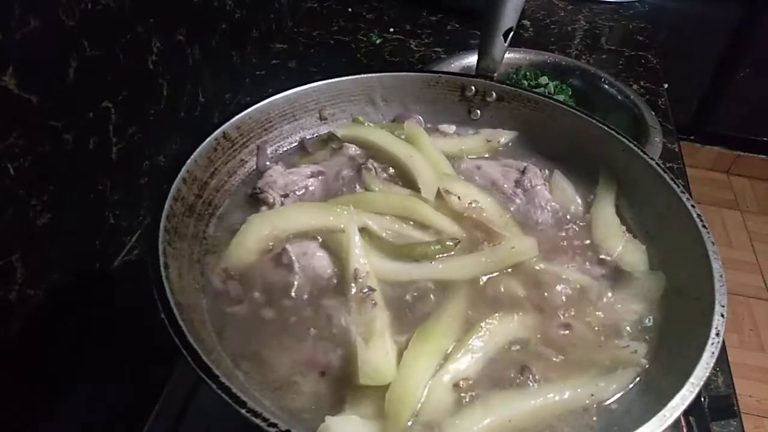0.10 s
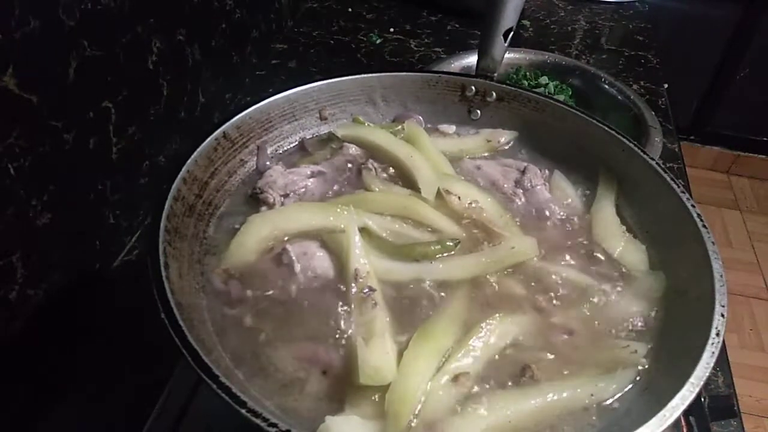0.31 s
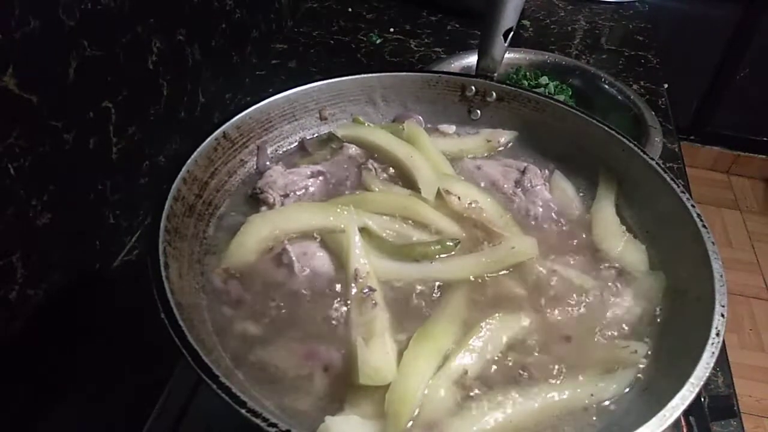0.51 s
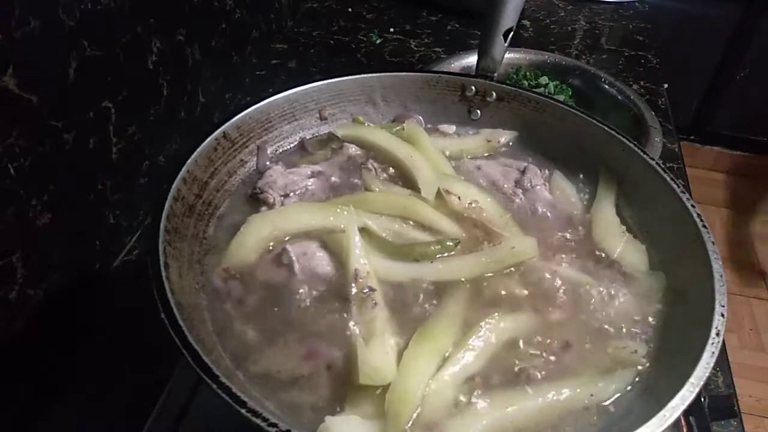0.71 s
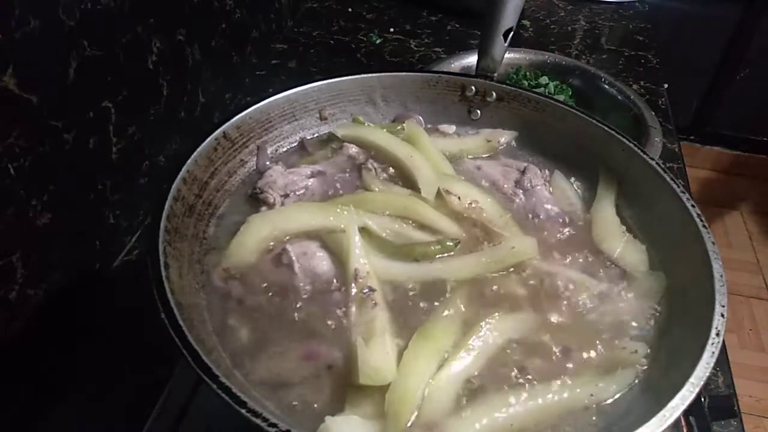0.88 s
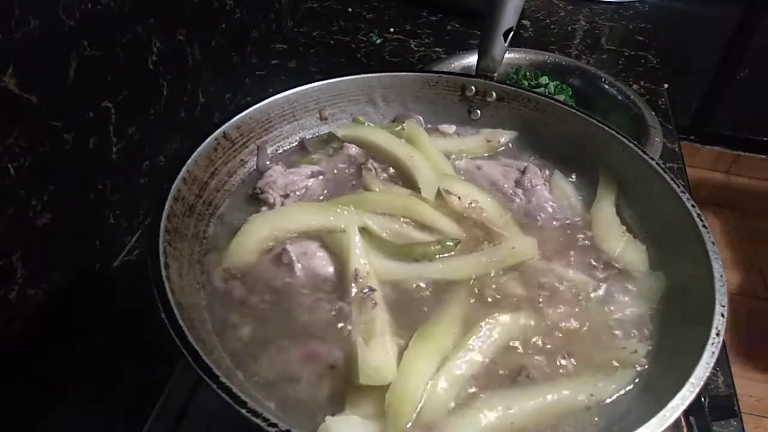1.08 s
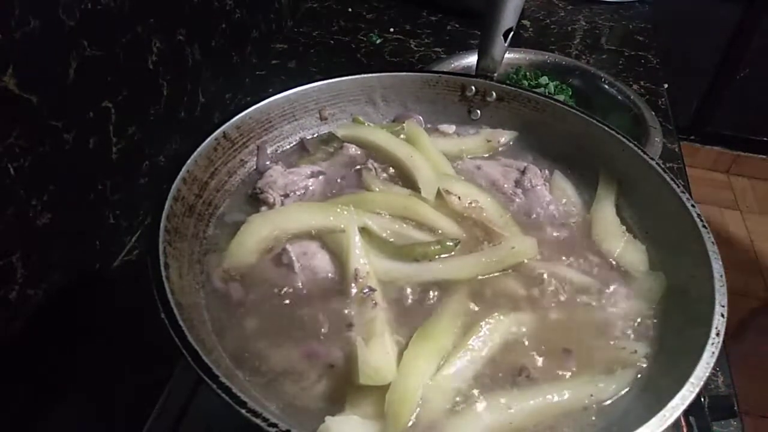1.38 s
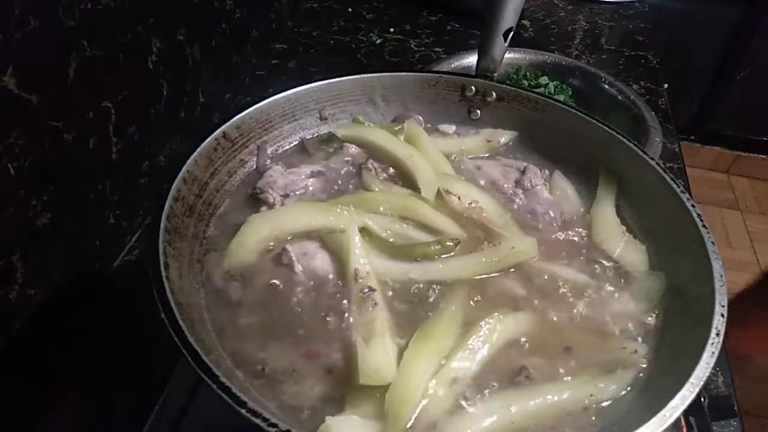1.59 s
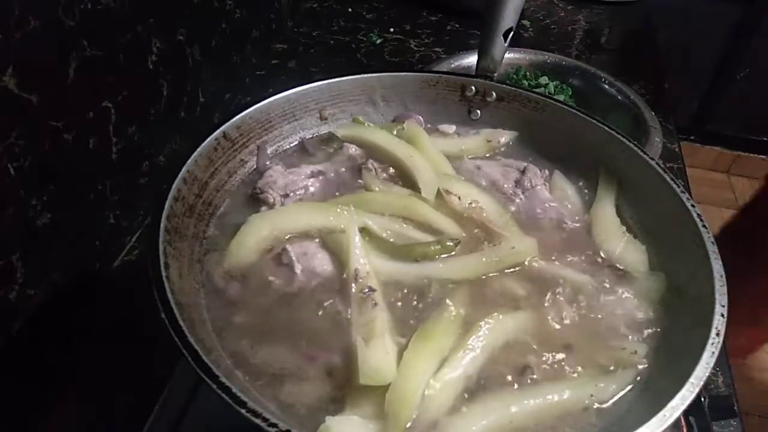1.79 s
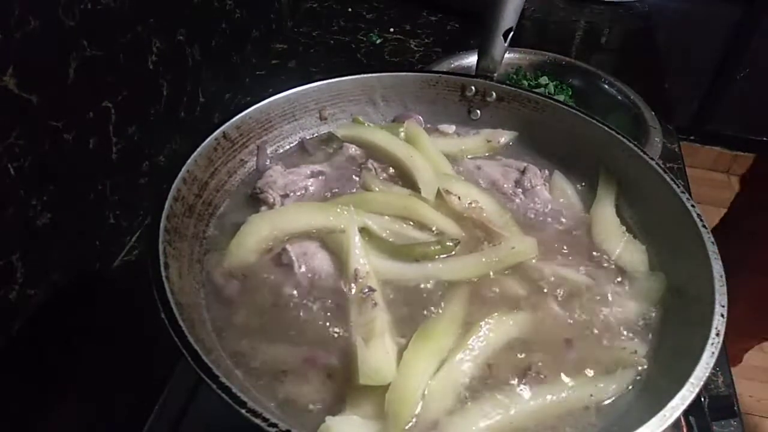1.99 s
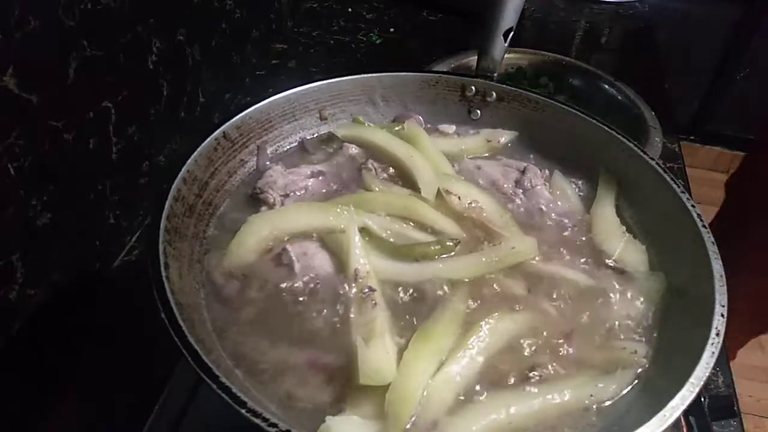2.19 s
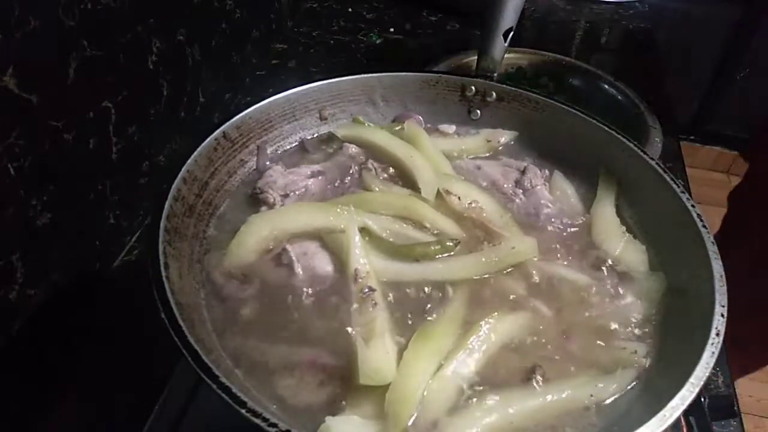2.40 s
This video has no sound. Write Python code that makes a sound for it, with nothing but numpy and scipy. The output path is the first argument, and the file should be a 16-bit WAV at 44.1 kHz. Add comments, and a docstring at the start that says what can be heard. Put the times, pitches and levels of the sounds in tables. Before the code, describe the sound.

Thick broth simmers with a strong early burst of gurgling and fizz, clustered round blips before one second, another sharp hiss after it, then sparser plops and spitting ticks, close phone microphone, quiet kitchen.

```python
"""Broth boiling in a wide pan, close to a phone: noise and sparse grains make a gritty hiss that swells about
twice a second, as a scuffing step or a surge of the boil would. Single bubbles pop as short climbing tones,
many such tones crowd into gurgles, and droplets tick as puffs of noise. A hard small kitchen answers the
bubbles and droplets with a decaying noise tail. Low noise bands make a faint stove rumble beneath."""
import sys
import numpy as np
from scipy import signal
from scipy.fft import rfft, irfft, next_fast_len
from scipy.io import wavfile
from scipy.ndimage import uniform_filter1d, map_coordinates

SR = 44100
rng = np.random.default_rng(int(sys.argv[2]) if len(sys.argv) > 2 else 0)


def makeup_ratio(level_db):
    """Linear amplitude ratio for a level in decibels (20 dB per factor of ten)."""
    decades = np.asarray(level_db, float) / 20
    return 10 ** decades


def store_wav(level_fs):
    """Save 16-bit WAV to argv[1]."""
    pcm = np.round(np.clip(np.atleast_2d(level_fs), -1, 1) * 32767)
    wavfile.write(sys.argv[1], SR, pcm.T.astype(np.int16))


N = 112455

# How two near microphones hear one sound. Each row: frequency in Hz, left-right likeness (1 = identical).
LIKENESS = [(60, 0.91), (180, 0.94), (540, 0.53), (1620, -0.071), (4870, -0.06), (14600, -0.12)]
# Balance of the pan between left and right. Each row: frequency in Hz, left over right in dB.
BALANCE = [(60, 3), (120, 0), (200, -6), (370, 5), (900, 0.5), (2300, 2), (4300, 4.5), (8000, 7),
           (12000, -2), (14600, 11)]
# Swells of the hiss. Each row: time in seconds, strength in dB, coarse rasp over the fine hiss in dB.
HISS_SWELLS = [(0.0, -46.5, 0.5), (0.08, -55, -8), (0.1, -51, -10), (0.19, -52, -7), (0.2, -58, 4.5),
               (0.23, -34.5, -18), (0.27, -28.5, -17), (0.34, -36, -7), (0.42, -38.5, -10.5),
               (0.45, -42.5, -5.5), (0.57, -48, -23.5), (0.69, -47.5, -37), (0.7, -48, -9.5),
               (0.75, -35.5, -14), (0.78, -41, -7.5), (1.01, -47, -11.5), (1.04, -58, -2.5),
               (1.16, -48, -21), (1.17, -63.5, -8), (1.2, -29, -23.5), (1.23, -36.5, -22),
               (1.28, -35.5, -15), (1.31, -41.5, -10.5), (1.45, -44.5, -15), (1.48, -40.5, -18.5),
               (1.5, -43.5, -5.5), (1.55, -44.5, -13.5), (1.6, -52, -12), (1.62, -50, -25),
               (1.63, -59.5, -12), (1.65, -49.5, -24), (1.72, -62.5, -31), (1.73, -64, -40),
               (1.77, -42, -21), (1.97, -46, -20.5), (1.99, -39.5, -13.5), (2.04, -44.5, -11.5),
               (2.12, -32, -18.5), (2.2, -42, -9.5), (2.23, -37, -15.5), (2.31, -50, -16.5),
               (2.55, -47.5, -27)]
# Colour of the fine sizzle. Each row: frequency in Hz, relative density in dB per Hz.
FINE_COLOUR = [(2240, -45.5), (3800, -21), (5110, -8.5), (6490, -13), (8480, 3), (8970, 2.5), (9940, 0.5),
               (11700, -9.5), (13700, -17.5), (14300, -16), (14800, -57)]
# Colour of the coarse rasp. Each row: frequency in Hz, relative density in dB per Hz.
COARSE_COLOUR = [(260, -68), (450, -22), (715, -6.5), (875, -27.5), (987, -3), (1380, -10), (2420, 0.5),
                 (3310, 5), (5000, 2.5), (6500, 15), (11000, -120)]
# Colour of stove and room. Each row: frequency in Hz, relative density in dB per Hz.
RUMBLE_COLOUR = [(13, -53), (22, -10), (140, -2), (254, -1), (325, -3.5), (425, -4), (682, -2.5), (821, -8),
                 (1140, -6.5), (2600, -13), (3000, -5), (3900, -36), (6600, -120)]
# Wavering low tones. Each row: centre in Hz, width of the flat top in Hz, mean level in dB.
LOW_TONES = [(58.5, 11, -90.5), (120, 17, -85), (169.5, 25, -85), (324.3, 29.3, -81.5)]
# Swarms of bubbles. Each row: start in seconds, length in seconds, level in dB, middle pitch in Hz,
# scatter of the natural log of pitch.
SWARMS = [(0, 0.053, -59.5, 1460, 0.13), (0, 0.057, -58.5, 2530, 0.11), (0.207, 0.042, -56.5, 1230, 0.39),
          (.44, 0.092, -67.5, 1160, 0.17), (.206, 0.058, -53, 495, .12), (.21, .13, -55.5, 304, 0.049),
          (.215, 0.11, -65, 198, 0.1), (.24, 0.21, -55.5, 703, 0.092), (0.231, 0.25, -53, 1110, .2),
          (.23, 0.2, -51.5, 1670, 0.19), (0.238, 0.19, -50.5, 2425, 0.107), (0.677, .08, -57, 585, 0.13),
          (.68, .1, -64.5, 380, 0.14), (0.698, 0.14, -58.5, 1386, 0.27), (0.822, 0.13, -63, 1390, 0.19),
          (0.801, .15, -61, 2750, 0.092), (0.925, 0.18, -64, 1125, 0.077),
          (1.184, 0.034, -68.5, 188, 0.035), (1.186, .08, -61, 598, 0.1), (1.208, 0.051, -60, 2360, 0.079),
          (1.199, 0.084, -54, 3165, 0.042), (1.3, 0.13, -59, 1280, 0.033), (1.3, 0.2, -70.5, 117.6, 0.11),
          (1.304, 0.17, -88, 61, 0.14), (1.315, 0.064, -56, 2280, 0.13), (1.44, .16, -65.5, 324, 0.026),
          (1.738, 0.063, -73.5, 1700, 0.039), (1.959, 0.028, -62.5, 1240, 0.12),
          (1.988, .1, -63.5, 877, .1), (1.998, 0.082, -66.5, 1810, 0.035), (2.002, 0.065, -61, 2400, 0.076),
          (2.078, 0.085, -63.5, 2840, .05), (2.172, 0.061, -60.5, 2720, 0.053),
          (2.16, 0.023, -67.5, 331, 0.047), (2.248, .04, -70, 326, 0.064), (2.302, 0.079, -71.5, 1270, .08),
          (2.399, 0.13, -82, 65, 0.17)]
# Ring of one bubble in a swarm. Each row: pitch in Hz, time to -60 dB in seconds.
SWARM_RING = [(60, .09), (330, .07), (1000, .02), (3000, .012)]
# Single bubbles, some bursting together. Each row: start in seconds, peak in dB before balance, pitch in Hz,
# left over right in dB, cycles to -60 dB.
BUBBLES = [(.08, -61, 1220, -4, 24), (.141, -55.5, 1280, -19, 25), (.142, -61, 650, 14, 29),
           (.158, -59, 1230, -18, 25), (.37, -31.5, 1200, 0, 9), (.371, -27.5, 1670, -1, 5),
           (.645, -49.5, 1117, 4, 54), (.647, -55.5, 1637, -10, 50), (.696, -33.5, 1580, 3.5, 28),
           (.697, -38.5, 1300, -6, 17), (.753, -43.5, 1430, 1, 41), (.755, -47, 1110, -2, 23),
           (.79, -41.5, 1570, 8, 22), (.791, -43.5, 1110, -8, 14), (.793, -56.5, 488, 18.5, 12),
           (.811, -47, 1340, 0, 30), (.838, -62, 880, 2, 24), (.853, -50, 2070, 14, 30),
           (.878, -47.5, 2725, 4, 53), (.908, -41, 1330, -4, 14), (.927, -41, 1020, -4, 22),
           (.928, -42, 1420, -3, 16), (.93, -58.5, 661, 1, 75), (.945, -45, 1100, 0, 12),
           (.946, -44, 1520, -1, 7), (.994, -49, 1074, 2, 23), (.99, -58.5, 677, 5, 37),
           (1.022, -43, 1210, -4, 17), (1.086, -52, 1193, -13, 30), (1.088, -62.5, 690, 2, 17),
           (1.186, -39.5, 1110, 4.5, 16.5), (1.187, -46.5, 870, 4, 26), (1.186, -48, 532, 4, 16),
           (1.222, -52.5, 646, 3, 17), (1.311, -50, 1210, 1, 30), (1.478, -57, 672, 14.5, 30),
           (1.51, -62, 657, 7, 27), (1.729, -50.5, 684, 0.5, 33), (1.73, -57, 1014, 19.5, 33),
           (1.733, -57, 1710, -13, 33), (1.815, -53, 598, 3.5, 34), (1.851, -53.5, 704, 0, 15),
           (1.868, -58.5, 1370, 17, 41), (1.868, -54.5, 805, -7, 8), (1.955, -55.5, 1102, -17, 40),
           (1.983, -49, 900, -12, 13.5), (1.988, -58, 2110, -11, 58), (2.129, -49.5, 1143, -3, 25),
           (2.13, -57, 1550, 11, 46), (2.283, -52.5, 1205, -7, 19), (2.29, -49, 1336, 3, 26),
           (2.376, -53.5, 658, 7, 22), (2.396, -52.5, 650, 8, 30), (2.492, -51, 690, 4, 45),
           (2.518, -49, 677, 1, 24)]
# Droplets. Each row: start in seconds, peak in dB before balance, left over right in dB, seconds to -60 dB.
DROPLETS = [(0.095, -36.5, 9, 0.024), (0.1334, -37, 4, 0.014), (0.1605, -35, 4.0, 0.02),
            (0.1794, -40, -10, 0.017), (0.5694, -40, 9, 0.012), (1.096, -34, -0.5, 0.023),
            (1.1432, -40, 12, 0.014), (1.1864, -37, 9, 0.02), (1.3329, -30.5, 7, 0.02),
            (1.3544, -40, -1, 0.017), (1.468, -31, -7, 0.026), (1.5515, -30, 1, 0.017),
            (1.5644, -38, -3, 0.026), (1.6162, -36.5, 6.5, 0.031), (1.6439, -36, 8, 0.022),
            (1.7283, -43, 11.5, 0.028), (1.7454, -40.5, 10, 0.027), (1.8063, -49, 0, 0.02),
            (1.8226, -36, 5.5, 0.033), (1.8454, -32.5, 9, 0.02), (1.8905, -33, 8.5, 0.015),
            (2.3328, -31, 4.5, 0.03), (2.3813, -30.5, 4, 0.014), (2.4058, -29.5, 4, 0.0078),
            (2.4445, -37, -1.5, 0.014), (2.4776, -38, -3, 0.02), (2.5284, -31.5, 8, 0.041)]
# Ring of the hard small room. Each row: frequency in Hz, time to -60 dB in seconds.
ROOM_RING = [(200, 0.12), (1200, 0.42), (9000, 0.067)]

FINE_GRAINS, COARSE_GRAINS = 2500, 900  # a second
RUMBLE_DB, KITCHEN_DB = -74.5, -17
SWARM_FADE_DB = 19  # loss over a swarm's length
SWARM_SWELL_DB, SWARM_SWELL = 9.5, 0.35  # softening of the first bubbles; its decay as a share of the length
PITCH_CLIMB = 0.053  # pitch gains twice this share over a ring to -60 dB
POP_START = 0.14  # soft start as a share of the ring
TICK_RISE_S = 0.0012
TOP_HZ = 14450


def unit(x):
    """Scale to rms 1."""
    return x / np.sqrt(np.mean(x ** 2) + 1e-20)


def along(points, hz):
    """Read (Hz, value) points along a log frequency axis."""
    f, v = np.transpose(points)
    return np.interp(np.log(hz + 1), np.log(f + 1), v)


def wobble(rate):
    """A smooth random curve, with rate knots a second."""
    knots = rng.standard_normal(int(N * rate / SR) + 4)
    return map_coordinates(knots, [np.arange(N) * rate / SR])


def sides(left_db):
    """Gains of left and right for a balance in dB."""
    return makeup_ratio(np.array([left_db / 2, -left_db / 2]))


def half_angle(hz):
    """Half the phase angle whose cosine is the likeness of the two near microphones."""
    return np.arccos(np.clip(along(LIKENESS, hz), -1, 1)) / 2


def coloured(pair, spectrum):
    """Two unrelated signals get a spectrum, and the likeness and balance of two near microphones."""
    m = next_fast_len(N + 8192)
    hz = np.fft.rfftfreq(m, 1 / SR)
    turn = half_angle(hz)
    mid, side = rfft(pair, m) * makeup_ratio(along(spectrum, hz)) * [np.cos(turn), np.sin(turn)]
    left_right = [mid + side, mid - side] * sides(along(BALANCE, hz))
    return unit(irfft(left_right, m)[:, :N])


def grit(rate, spread_db, share, patchy_db):
    """Sparse uneven impulses mixed into noise, with random gain in patches of time and frequency."""
    struck = rng.random((2, N)) < rate / SR
    sizes = makeup_ratio(spread_db * rng.exponential(size=(2, N)))
    grains = struck * sizes * rng.standard_normal((2, N))
    z = signal.stft(share * unit(grains) + rng.standard_normal((2, N)), nperseg=256)[2]
    field = uniform_filter1d(rng.standard_normal(z.shape[1:]), size=5, axis=0)
    field = uniform_filter1d(field, size=12, axis=1)
    return signal.istft(z * makeup_ratio(patchy_db * unit(field)), nperseg=256)[1][:, :N]


def hiss():
    """Boiling sizzle: fine grit and a coarser rasp follow one strength curve, each with small flickers."""
    s, strength, rasp = np.transpose(HISS_SWELLS)
    t = np.arange(N) / SR
    strength_db, rasp_db = np.interp(t, s, strength), np.interp(t, s, rasp)
    fine = coloured(grit(FINE_GRAINS, spread_db=1.5, share=0.59, patchy_db=2.5), FINE_COLOUR)
    coarse = coloured(grit(COARSE_GRAINS, spread_db=-0.5, share=0.57, patchy_db=4.5), COARSE_COLOUR)
    fine = makeup_ratio(0.4 * wobble(59.92) + 0.5 * wobble(200)) * fine
    coarse = makeup_ratio(rasp_db + 0.3 * wobble(30.05)) * coarse
    return makeup_ratio(strength_db) * (fine + coarse)


def rumble():
    """Stove and room murmur as slowly wavering low noise, with narrow noise bands as low tones."""
    murmur = coloured(grit(300, spread_db=-2.5, share=0.11, patchy_db=1.9), RUMBLE_COLOUR)
    out = makeup_ratio(RUMBLE_DB + 0.5 * wobble(5.08)) * murmur
    for hz, width, db in LOW_TONES:
        band = [(hz - 2 * width, -60), (hz - width / 2, 0), (hz + width / 2, 0), (hz + 2 * width, -60)]
        out = out + makeup_ratio(db + 1.1 * wobble(2.3)) * coloured(rng.standard_normal((2, N)), band)
    return out


def rings(s, db, hz, cycles, left_db, start_s):
    """Bubbles as damped tones with soft start and climbing pitch; each leads in phase on one side."""
    out = np.zeros((2, N + SR))
    draws = rng.random((len(s), 2))
    for s0, d, f, k, p, start, (u, v) in zip(s, db, hz, cycles, left_db, start_s, draws):
        t = np.arange(int(min(k / f, .3) * SR) + 2) / SR
        lag = half_angle(f) * np.array([[-1], [1]]) * np.sign(u - .5)
        shape = makeup_ratio(-60 * t * f / k) * (1 - np.exp(-(t / start) ** 2))
        turns = f * t * (1 + PITCH_CLIMB * t * f / k) + v
        tone = np.sin(2 * np.pi * turns + lag) * makeup_ratio(d) * shape / shape.max()
        out[:, max(round(s0 * SR), 0):][:, :len(t)] += tone * sides(p)[:, None]
    return out[:, :N]


def gurgles(count=120):
    """Swarms of overlapping bubble tones scatter around one pitch, swelling at first, then fading."""
    out = 0
    for s, length, db, hz, scatter in SWARMS:
        u, g = rng.random(count), rng.standard_normal((count, 3))
        t60 = along(SWARM_RING, hz)
        # Power of the overlapping decays, taken off so the swarm keeps its level.
        overlap_db = 10 * np.log10(count * t60 / (length * 4 * np.log(1000)))
        fade_db = SWARM_FADE_DB * (u - .5) + SWARM_SWELL_DB * np.exp(-u / SWARM_SWELL)
        bubble_db = db - overlap_db - fade_db + 3.0 * g[:, 0]
        pitch = hz * np.exp(scatter * g[:, 1])
        left_db = along(BALANCE, hz) + 0.5 * g[:, 2]
        cycles, start_s = np.full(count, t60 * hz), np.full(count, 1.47 / hz)
        out = out + rings(s + length * u, bubble_db, pitch, cycles, left_db, start_s)
    return out


def pops():
    """Each single bubble rings briefly at its own pitch as a damped tone."""
    s, db, hz, left_db, cycles = np.transpose(BUBBLES)
    return rings(s, db, hz, cycles, left_db, POP_START * cycles / hz)


def ticks():
    """Droplets burst as short decaying puffs of noise in the colour of the sizzle."""
    out, t = np.zeros((2, N + 999)), np.arange(900) / SR
    spray = coloured(rng.standard_normal((2, N)), FINE_COLOUR)
    for (s, db, left_db, t60), u in zip(DROPLETS, rng.random(len(DROPLETS))):
        piece = spray[:, int(u * (N - len(t))):][:, :len(t)]
        puff = piece * makeup_ratio(-60 * t / t60) * (1 - np.exp(-(t / TICK_RISE_S) ** 2))
        puff = puff / abs(puff).max(axis=1, keepdims=True)
        out[:, round(s * SR):][:, :len(t)] += makeup_ratio(db) * sides(left_db)[:, None] * puff
    return out[:, :N]


def kitchen(x):
    """The room answers with a noise tail whose frequencies each die at their own speed."""
    hz, t, z = signal.stft(rng.standard_normal((2, SR // 2)), SR, nperseg=256)
    decay = makeup_ratio(-60 * t / along(ROOM_RING, hz)[:, None])
    tail = signal.istft(z * decay, SR, nperseg=256)[1]
    late = np.pad(x, ((0, 0), (260, 0)))  # samples before the first reflection
    return signal.fftconvolve(late, tail / np.linalg.norm(tail[0]), axes=1)[:, :N]


def scene():
    """Bubbles and droplets with the kitchen's answer, over the close hiss and the rumble."""
    drops = pops() + gurgles() + ticks()
    return drops + makeup_ratio(KITCHEN_DB) * kitchen(drops) + hiss() + rumble()


def low_pass(x):
    """Removes everything above the highest recorded frequency."""
    return signal.sosfilt(signal.butter(12, 15200, fs=SR, output="sos"), x)


def record(dry):
    """The phone picks up nothing above a sharp upper band limit."""
    m = next_fast_len(N + 4096)
    passed = np.fft.rfftfreq(m, 1 / SR) < TOP_HZ
    mix = irfft(rfft(dry, m) * passed, m)[:, :N]
    return low_pass(mix)


dry = scene()
out = record(dry)
store_wav(out)
```